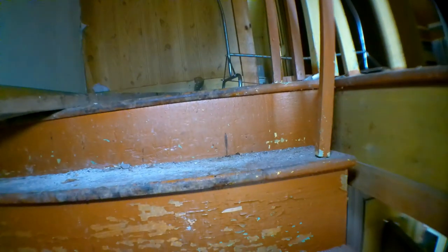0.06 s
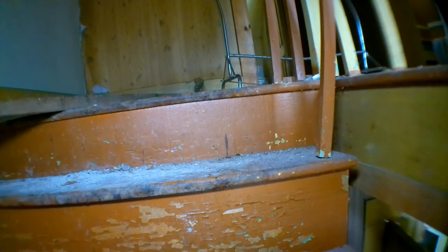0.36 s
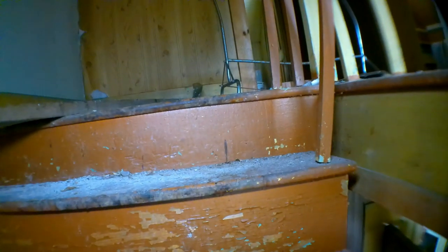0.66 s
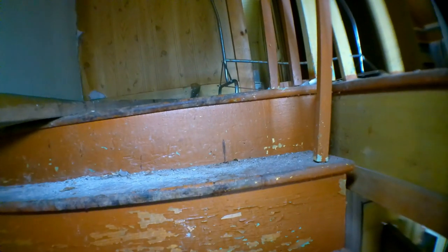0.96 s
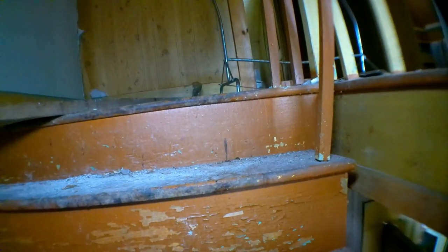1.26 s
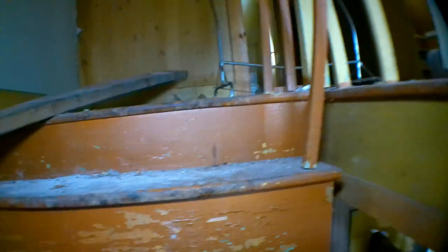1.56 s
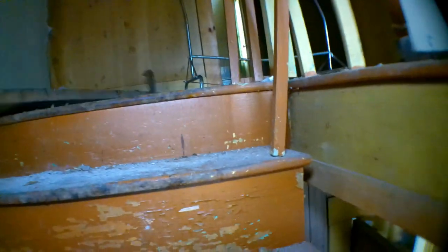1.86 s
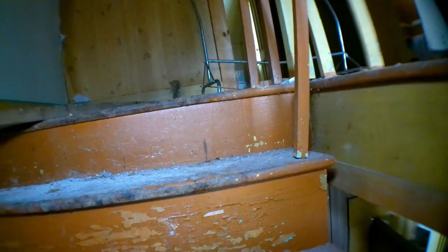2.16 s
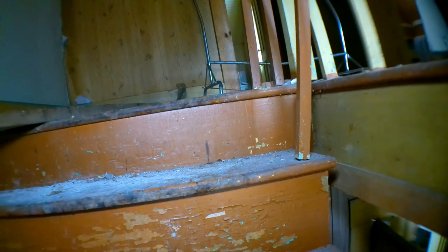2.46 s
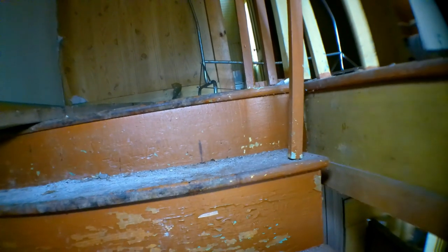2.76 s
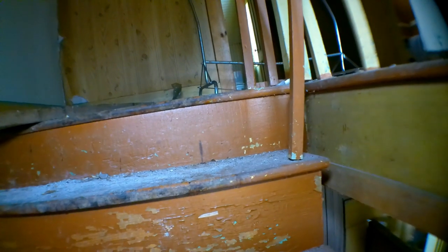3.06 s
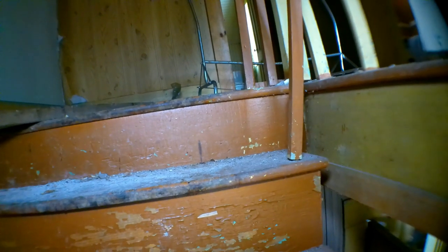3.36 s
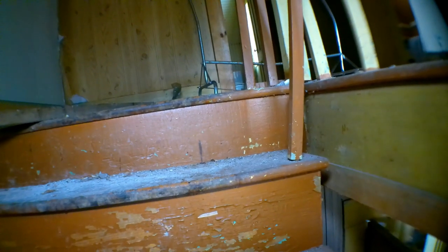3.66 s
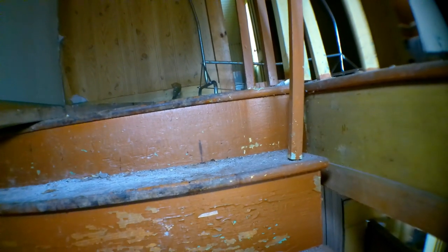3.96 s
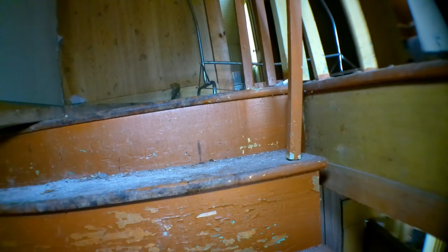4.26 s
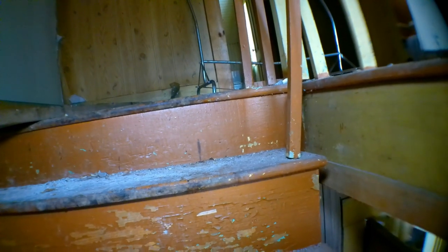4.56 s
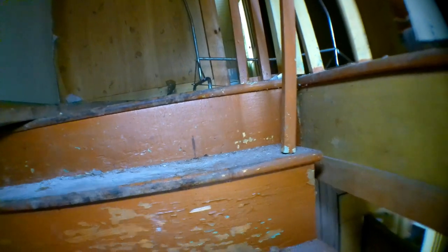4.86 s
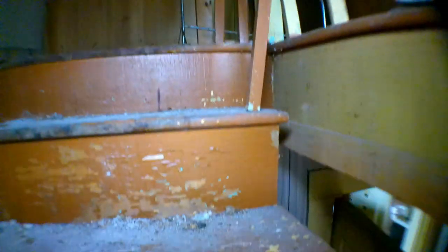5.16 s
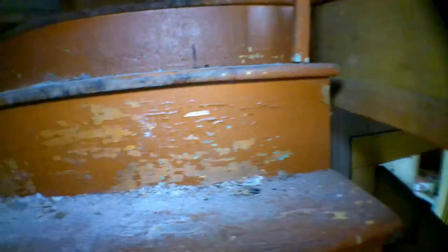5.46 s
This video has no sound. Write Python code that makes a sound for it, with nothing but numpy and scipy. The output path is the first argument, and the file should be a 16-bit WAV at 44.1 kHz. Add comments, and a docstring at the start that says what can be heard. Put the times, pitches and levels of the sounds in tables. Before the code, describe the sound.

Underfoot, a board drags and bangs down on old wooden stairs with crunching plaster, followed after a pause by two lighter steps.

```python
"""A loose plank scrapes and slams underfoot on old wooden stairs, heard from their foot in a bare room.
A step levers the plank up; it drags, falls back and rattles on the hollow staircase, and grit crackles
as the weight settles. Later two lighter steps clack on the littered floor and clothes rustle.
Under it all, the camera's microphone channel carries a faint hiss, a low frame-rate buzz and soft blips."""
import sys
import numpy as np
from scipy import signal
from scipy.fft import rfft, irfft, next_fast_len
from scipy.io import wavfile

SR = 44100
rng = np.random.default_rng(int(sys.argv[2]) if len(sys.argv) > 2 else 0)


def wav_record(signal):
    """Record a signal, one row per channel, as 16-bit PCM in the file named by sys.argv[1]."""
    frames = np.transpose(np.atleast_2d(signal))
    bounded = np.clip(frames, -1, 1)
    # unit amplitude maps onto the largest positive 16-bit level
    quanta = np.round(bounded * 32767).astype(np.int16)
    wavfile.write(sys.argv[1], SR, quanta)


N = 243431
BURST = SR // 4  # samples in one contact

# weight landing on the hollow stairs: t/s, level/dB, contact time/ms
LANDINGS = [(1.913, 5, 2.3), (2.036, 1, 2.46), (2.078, -3, 0.8)]


def plank_clacks(edge_gap_s=0.0178):
    """The plank strikes the stairs one edge after the other and rings; the foot damps much of the ring."""
    # blows: t/s, knock/dB, crack re knock/dB, second edge re first/dB
    strikes = [(1.425, -16, -2, 1.5), (1.544, -19, -9.5, 3), (1.878, -23, -1.5, -7),
               (1.912, -0.5, -23.5, -0.5), (2.072, -10.5, -16, -4), (2.188, -24.5, -0.5, -6.5)]
    # spectra of the wood's dull knock and its surface crack: f/Hz, level/dB
    knock_spectrum = [(40, -30.5), (110, -1), (200, 3), (480, -2), (620, -2.5), (1000, -1.5), (1400, -9),
                      (2000, -19.5), (4000, -28), (16000, -70.5)]
    crack_spectrum = [(300, -31.5), (1200, -1.5), (2000, 1.5), (3000, 0.5), (4700, -1), (6200, -10.5),
                      (7500, -16.5), (10000, -24.5), (15500, -39.5)]
    blows = []
    for s, db, crack_db, second_db in strikes:
        blows += [(s, db, crack_db), (s + edge_gap_s, db + second_db, crack_db)]
    knocks, cracks = contacts(blows, knock_spectrum, crack_spectrum,
                              knock_t60=0.094, crack_t60=0.086, snap=2.3)
    return room(knocks + cracks, wet_db=-9) + amp(-8) * filtered(knocks, plank_response)


def plank_scrape():
    """Slips excite the plank, heavy slow ones its deep modes, while dust is ground under the sole."""
    # the sole pressing into plaster dust: t/s, level/dB, hold/s
    presses = [(1.443, -33, 0.028), (1.542, -33, 0.012), (1.883, -28.5, 0.027), (2.03, -30, 0.043),
               (2.286, -45.5, 0.014)]
    # the plank's dry edge catching on the tread: t/s, level/dB
    catches = [(1.807, -30.5), (1.895, -34.5)]
    # spectra of coarse dust, fine powder, the dry edge, light and heavy slips: f/Hz, level/dB
    dust_spectrum = [(300, -46), (1200, 1), (1900, -5), (2300, -5.5), (3200, 2), (3700, -6.5), (4200, 0),
                     (5500, -4), (6300, -8), (7200, -11.5), (8000, -12.5), (10000, -20), (15500, -42)]
    powder_spectrum = [(3000, -30.5), (7000, -6), (9000, -2.5), (12000, -5), (15500, -11.5)]
    edge_spectrum = [(2500, -26), (3200, -0.5), (3700, -13), (4200, 3), (4900, -17), (5600, -13.5),
                     (6400, -1.5), (7200, -31), (15000, -46.5)]
    light_spectrum = [(100, -5), (300, -1.5), (1000, 5), (1800, 1.5), (3500, -3.5), (7000, -13.5),
                      (15000, -42.5)]
    heavy_spectrum = [(100, -9), (300, 1.5), (520, 2.5), (750, -8), (1500, -31.5), (6000, -100)]
    rub, weight = plank_drag()
    light_slips = coloured(grains(rate=1500, spread_db=3), light_spectrum)
    heavy_slips = coloured(grains(rate=600, spread_db=2), heavy_spectrum)
    wood = amp(-3) * rub * unit(filtered(light_slips, plank_response))
    groan = amp(-10) * weight ** 0.9 * unit(filtered(heavy_slips, plank_response))
    pressure = amp(-10.5) * rub
    pressure += sum(amp(db) * swell(s, rise=0.006, hold=hold, release=400) for s, db, hold in presses)
    crushing = grains(rate=1300, spread_db=3)
    dust = amp(-3.5) * pressure * coloured(crushing, dust_spectrum)
    # only hard pressure crushes the finest grains
    powder = amp(-5.5) * pressure ** 1.7 * coloured(crushing, powder_spectrum)
    catching = sum(amp(db) * swell(s, rise=0.045, hold=0, release=600) for s, db in catches)
    squeak = catching * coloured(grains(rate=2100, spread_db=8), edge_spectrum)
    return wood + groan + room(dust + powder + squeak, wet_db=-10)


def plank_drag():
    """How hard the plank rubs and how much weight it bears, as gains over time."""
    # drags under the foot: t at full speed/s, rise/s, hold/s, slowing/(dB/s), rub/dB, weight/dB
    drags = [(1.424, 0.011, .19, 3.5, -30, -30.5), (1.793, 0.064, .09, 15.5, -25.5, -32.5),
             (1.929, 0.013, 0.072, 131, -26.5, -15), (2.077, 0.041, 0.139, 74, -26, -10.5)]
    rub, weight = np.zeros(N), np.zeros(N)
    for s, rise, hold, slowing, rub_db, weight_db in drags:
        rub += amp(rub_db) * swell(s, rise, hold, release=240.5, sag=slowing)
        weight += amp(weight_db) * swell(s, rise, hold, release=270.5, sag=slowing)
    settling = amp(-60.5) * swell(2.27, rise=0.05, hold=0.26, release=85)
    return rub + settling, weight + amp(-5) * settling


def plank_response(hz):
    """The loose plank resonates in its own modes."""
    # modes: f/Hz, width/Hz, level/dB
    plank_modes = [(319, 14, 0), (353, 14, -7), (435, 16, -10), (513, 14, 0), (718, 16, -1), (768, 16, -1),
                   (820, 16, -5), (971, 22, -1.5), (1023, 22, -6), (1146, 22, -11), (1389, 26, -12),
                   (1560, 55, -6), (1740, 50, -10), (1850, 50, -10), (2110, 50, -11), (2440, 70, -15),
                   (2780, 70, -14), (3180, 140, -11)]
    return resonances(plank_modes, hz)


def stair_thumps(rock_gap_s=0.0365, rock_loss_db=3, rock_contact_ms=1.05):
    """Landings push the staircase, then the plank rocks to rest; longer contacts ring only low modes."""
    t = np.arange(BURST) / SR
    rocks = [(LANDINGS[-1][0] + (k + 1) * rock_gap_s, -5.5 - k * rock_loss_db, rock_contact_ms)
             for k in range(4)]
    push = np.zeros(N)
    for s, db, contact_ms in list(LANDINGS) + rocks:
        progress = t * 1000 / contact_ms
        force = progress * np.exp(-3 * progress)
        add(push, s, amp(db - 12.5) * force / force.sum())
    return staircase(push)


def stair_shudder():
    """Loaded treads judder under the dragging plank; the floor sways under the camera after the blow."""
    # spectra of the juddering force and the swaying floor: f/Hz, level/dB
    judder_spectrum = [(40, -15.5), (110, -1), (220, 1), (400, -8.5), (1500, -40.5), (6000, -100)]
    sway_spectrum = [(12, -10), (27, 2), (36, -5.5), (50, -19.5), (200, -58.5)]
    _, weight = plank_drag()
    force = coloured(grains(rate=490, spread_db=6.5), judder_spectrum)
    judder = amp(-3.5) * weight * unit(staircase(force))
    sway_gain = amp(-35.5) * swell(LANDINGS[0][0], rise=0.008, hold=0.27, release=42)
    return judder + sway_gain * coloured(rng.standard_normal(N), sway_spectrum)


def staircase(force):
    """A force rings the hollow staircase; open boards radiate little below their lowest note."""
    # modes: f/Hz, level/dB, t60/s
    stair_modes = [(87, -26, 0.3204), (106, 4.5, 0.069), (113.7, 0, 0.095), (137.3, -1, 0.23),
                   (170.1, -3, .16), (205, -11.5, 0.11), (238.3, -6, 0.39), (268.5, -23.5, 0.4),
                   (314, -11.5, 0.5), (346.5, -9.5, 0.16), (452.5, -16, 0.23), (482, -14.5, 0.3),
                   (717, -16.5, 0.3024)]
    t = np.arange(SR) / SR
    ring = sum(amp(db) * np.cos(2 * np.pi * hz * t) * dying(t, t60) for hz, db, t60 in stair_modes)
    low_cut = signal.butter(3, 72, "highpass", fs=SR, output="sos")
    return signal.fftconvolve(force, signal.sosfilt(low_cut, ring))[:N]


def tread_booms():
    """A tread bends, swells into its own note and is damped as the foot settles."""
    # single treads flexing: t/s, f/Hz, level/dB, length/s
    flexes = [(1.491, 318, -27, 0.12), (2.05, 513.4, -23, 0.16), (2.065, 321, -20.5, 0.24),
              (2.28, 87.7, -34, 0.26), (5.084, 108.5, -39, 0.17), (5.12, 330.4, -40.5, 0.19)]
    booms = np.zeros(N)
    for s, hz, db, length in flexes:
        t = np.arange(int(length * SR)) / SR
        bend = np.sin(np.pi * np.sqrt(t / length)) ** 2
        add(booms, s, amp(db) * bend * np.sin(2 * np.pi * hz * t))
    return booms


def floor_steps():
    """Lighter steps roll from heel to toe: the boards knock briefly and the walls return the crack."""
    # steps: t/s, level/dB, loss as the foot rolls on/(dB/s)
    footsteps = [(5.062, -4, 81), (5.262, 0.5, 8)]
    # contacts within a step: delay/s, knock/dB, crack re knock/dB
    heel_to_toe = [(0, -12.5, -6), (0.0174, -14.5, -1), (.049, -18, -13), (.068, -14.5, -8.5)]
    # spectra of the floor's knock and the litter's crack: f/Hz, level/dB
    floor_spectrum = [(40, -25), (110, -1), (200, -1.5), (420, -1.5), (1000, -5.5), (2000, -9.5),
                      (4000, -20.5), (16000, -71.5)]
    litter_spectrum = [(300, -25), (1200, -3.5), (2000, 0), (3000, 4), (3700, 0.5), (4700, 0.5), (6200, -8),
                       (7500, -16), (10000, -23.5), (15500, -40)]
    # floorboard modes: f/Hz, width/Hz, level/dB
    board_modes = [(197, 42, 3.5), (387, 55, -1), (503, 37, -1), (648, 92, -4.5), (824, 120, -7),
                   (1100, 260, -6), (1374, 68, -1), (2347, 400, -13)]
    taps = [(s + delay, db + knock_db - loss * delay, crack_db)
            for s, db, loss in footsteps for delay, knock_db, crack_db in heel_to_toe]
    taps.append((5.348, -20, -2.5))  # a last tap of the toe
    knocks, cracks = contacts(taps, floor_spectrum, litter_spectrum,
                              knock_t60=0.08, crack_t60=0.084, snap=4)
    ring = filtered(knocks, lambda hz: resonances(board_modes, hz))
    wood = amp(-5.5) * knocks + amp(-0.5) * ring
    return room(wood, wet_db=-11) + room(cracks, wet_db=-10)


def debris():
    """Crumbs of plaster snap and splinter, each at its own pitch, and a chip of wood tips over."""
    # grit snapping under the sole: t/s, level/dB, f/Hz
    snaps = [(1.711, -32.5, 3430), (1.884, -17, 3750), (2.03, -22, 3850), (2.152, -24, 3636),
             (2.295, -37.5, 3700), (2.400, -35, 3330), (2.445, -40, 3420), (2.486, -44, 7000),
             (2.510, -36.5, 3540), (2.528, -39.5, 3320), (2.620, -42, 3020), (2.669, -41, 3940),
             (2.7366, -40, 5140), (2.766, -48, 3500), (3.033, -50.5, 5500)]
    # the chip's taps: t/s, level/dB
    chip_taps = [(2.67, -40.5), (2.764, -54)]
    # its hollow spectrum: f/Hz, level/dB
    chip_spectrum = [(150, -24), (400, -10), (650, -0.5), (950, -2.5), (1200, -13), (1500, -5.5),
                     (2200, -22), (8000, -47)]
    crumbs, chip = np.zeros(N), np.zeros(N)
    for s, db, hz in snaps:
        crumb = impulse_response([(hz / 12, -24), (hz / 2, -9), (hz * 0.8, -5), (hz, 2), (hz * 1.1, -4),
                                  (hz * 1.7, -6), (hz * 3, -25), (hz * 6, -50)])
        add(crumbs, s, amp(db - 14.5) * burst(crumb, t60=0.037, snap=3.5))
        for delay in rng.uniform(0.0047, 0.026, size=3):  # splinters
            add(crumbs, s + delay, amp(db - 25) * burst(crumb, t60=0.0176, snap=5.14))
    for s, db in chip_taps:
        add(chip, s, amp(db - 2.5) * burst(impulse_response(chip_spectrum), t60=0.066, snap=5.64))
    return room(crumbs, wet_db=-6.5) + room(chip, wet_db=-10)


def clothes():
    """Fabric brushes softly as the leg swings forward."""
    # spectrum of the fabric: f/Hz, level/dB
    cloth_spectrum = [(500, -13), (2000, -2), (4500, -6), (7000, -15), (15000, -31)]
    swing = amp(-66) * swell(5.7, rise=0.068, hold=0.12, release=260)
    return swing * coloured(grains(rate=4400, spread_db=4), cloth_spectrum)


def room(x, wet_db, block=8192, delay_s=0.004):
    """Bare walls answer just behind the direct sound; each stretch gets a tail of its own."""
    # reverberation time: f/Hz, t60/s
    decay_times = [(100, 0.13), (400, 0.56), (1000, .38), (4000, 0.31), (8000, 0.31), (15000, 0.19)]
    heard = x.copy()
    for start in range(0, N, block):
        part = x[start:start + block]
        if np.abs(part).max() > 1e-6:
            hz, t, noise = signal.stft(rng.standard_normal(SR // 2), SR, nperseg=256)
            _, tail = signal.istft(noise * dying(t, along(decay_times, hz)[:, None]), SR)
            reflections = signal.fftconvolve(part, tail / np.linalg.norm(tail))
            add(heard, start / SR + delay_s, amp(wet_db) * reflections)
    return heard


def camera_noise(frame_hz=30.02):
    """Steady hiss, a dull drone, one soft electrical pulse per frame and a faint blip twice a second."""
    # buzz harmonics: multiple of the frame rate, level/dB
    harmonics = [(1, -0.5), (2, 0.5), (3, -6.5), (4, -3.5), (5, -3), (6, -7.5), (7, -6.5), (8, -8.5),
                 (9, -16), (10, -15.5)]
    # spectra of the noise floor's hiss and drone: f/Hz, level/dB
    hiss_spectrum = [(180, -33), (300, -4.5), (411, -3), (708, -7), (907, -7.5), (968, -8), (1160, -9.5),
                     (7620, -20), (15500, -25.5)]
    drone_spectrum = [(15, 5), (35, -8), (80, -10), (200, -6), (350, -20), (700, -24.5), (3000, -77)]
    t = np.arange(N) / SR
    phase = 2 * np.pi * frame_hz * (t - 0.0325)
    # the input coupling advances the low orders, so each pulse is followed by a dip
    buzz = unit(sum(amp(db) * np.cos(k * phase + 1.5 / k) for k, db in harmonics))
    from_blip = t % 0.5005 - 0.315
    blip = np.sin(2 * np.pi * 400 * from_blip) * np.exp(-(from_blip / 0.0026) ** 2)
    hiss = coloured(rng.standard_normal(N), hiss_spectrum)
    drone = coloured(rng.standard_normal(N), drone_spectrum)
    return amp(-60) * buzz + amp(-52.5) * blip + amp(-65.5) * hiss + amp(-64) * drone


def contacts(rows, body, surface, knock_t60, crack_t60, snap):
    """Each hard contact gives a dull knock in the body and a bright crack at the surface."""
    knocks, cracks = np.zeros(N), np.zeros(N)
    dull, bright = impulse_response(body), impulse_response(surface)
    for s, db, crack_db in rows:
        add(knocks, s, amp(db - 11) * burst(dull, knock_t60, snap))
        add(cracks, s, amp(db + crack_db - 10.5) * burst(bright, crack_t60, snap))
    return knocks, cracks


def burst(response, t60, snap):
    """One contact: a sharp tick of height snap and a dying scatter, at rms 1 over its first 10 ms."""
    force = rng.standard_normal(BURST) * dying(np.arange(BURST) / SR, t60)
    force[0] += snap
    hit = signal.fftconvolve(force, response)[:BURST]
    return hit / np.sqrt(np.mean(hit[:SR // 100] ** 2))


def grains(rate, spread_db):
    """Tiny slips of uneven size, on average rate a second."""
    slips = (rng.random(N) < rate / SR) * rng.choice([-1, 1], N)
    return slips * amp(spread_db * np.clip(rng.standard_normal(N), -2, 2))


def swell(s, rise, hold, release, sag=0):
    """A gain that climbs 20 dB per rise up to time s, sags while held, then falls; slopes in dB/s."""
    t = np.arange(N) / SR - s
    climb_db = 20 * np.minimum(t, 0) / max(rise, 1e-3)
    return amp(climb_db - sag * np.clip(t, 0, hold) - release * np.maximum(t - hold, 0))


def resonances(modes, hz):
    """The response of modes (f/Hz, width/Hz, level/dB), with deep valleys between them."""
    return sum(amp(db) * 1j * hz * width / (centre ** 2 - hz ** 2 + 1j * hz * width)
               for centre, width, db in modes)


def impulse_response(spectrum, size=4096):
    """The shortest (minimum-phase) impulse response that has the given spectrum."""
    hz = np.fft.rfftfreq(size, 1 / SR)
    cepstrum = irfft(np.log(amp(along(spectrum, hz))))
    cepstrum[1:size // 2] *= 2
    cepstrum[size // 2 + 1:] = 0
    return irfft(np.exp(rfft(cepstrum)))


def coloured(x, spectrum):
    """x shaped by a spectrum (f/Hz, level/dB), at rms 1."""
    return unit(filtered(x, lambda hz: amp(along(spectrum, hz))))


def filtered(x, response):
    """x through a frequency response."""
    size = next_fast_len(len(x) + SR // 2)
    hz = np.fft.rfftfreq(size, 1 / SR)
    return irfft(rfft(x, size) * response(hz), size)[:len(x)]


def along(points, hz):
    """Points (f/Hz, value) read on a log frequency axis."""
    freqs, values = np.transpose(points)
    return np.interp(np.log(hz + 1), np.log(freqs), values)


def dying(t, t60):
    """A decay of 60 dB in t60 seconds."""
    return np.exp(-np.log(1000) * t / t60)


def add(track, s, sound):
    """Mix a sound into the track at time s."""
    part = track[max(round(s * SR), 0):][:len(sound)]
    part += sound[:len(part)]


def amp(db):
    """Decibels to gain."""
    return 10 ** (np.asarray(db) / 20)


def unit(x):
    """Scale to rms 1."""
    return x / np.sqrt(np.mean(x ** 2) + 1e-20)


def scene():
    """Everything at one microphone at the foot of the stairs."""
    stairs = room(stair_thumps(), wet_db=-13.5) + stair_shudder() + tread_booms()
    plank = plank_clacks() + plank_scrape()
    return (stairs + plank + floor_steps() + clothes() + debris() + camera_noise())[None]


def record(dry):
    """The camera clips just under full scale and keeps nothing above its band limit."""
    clipped = np.clip(dry[0], -0.96, 0.96)
    return filtered(clipped, lambda hz: hz < 15820)[None]


dry = scene()
out = record(dry)
wav_record(out)
```